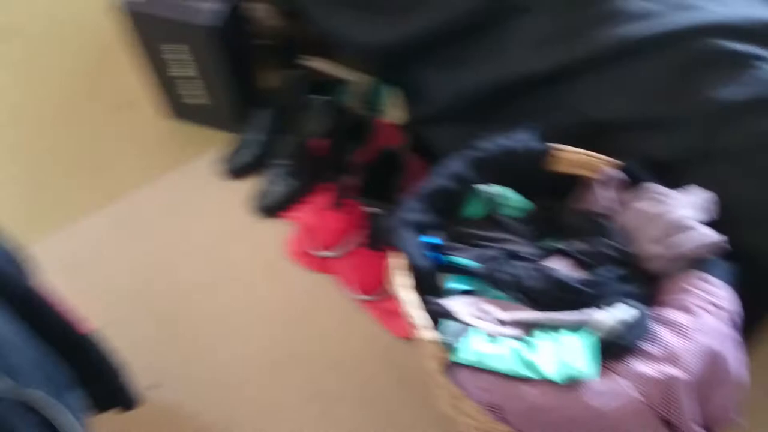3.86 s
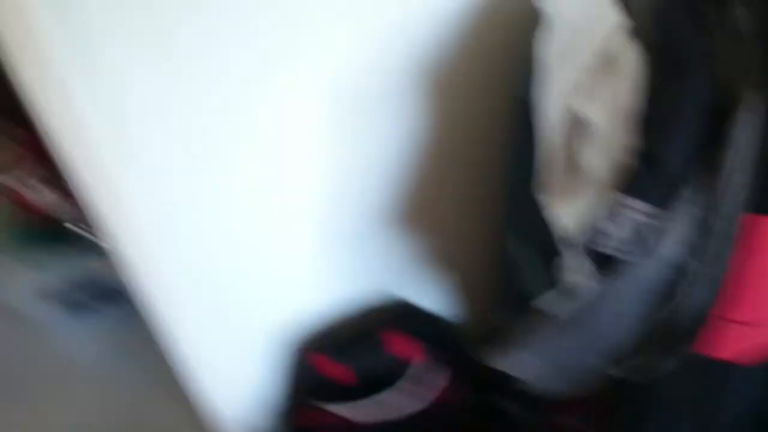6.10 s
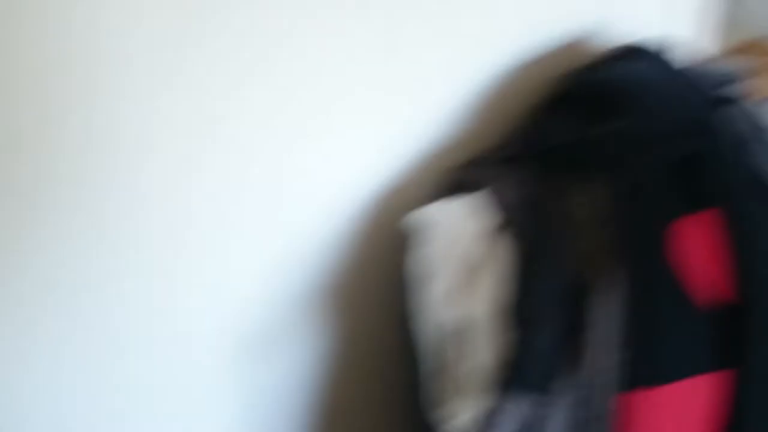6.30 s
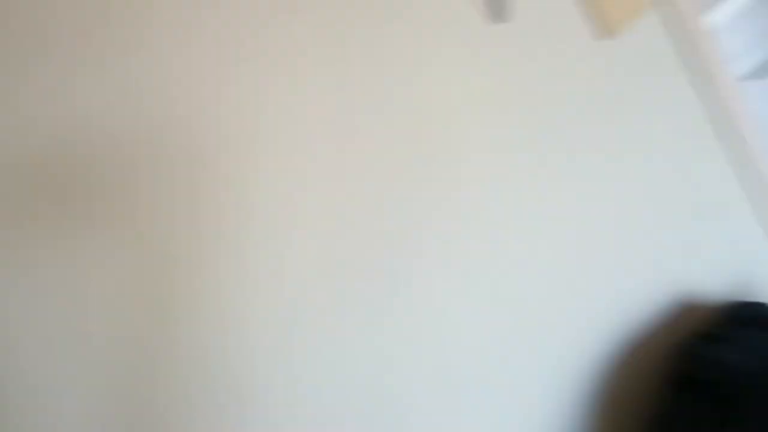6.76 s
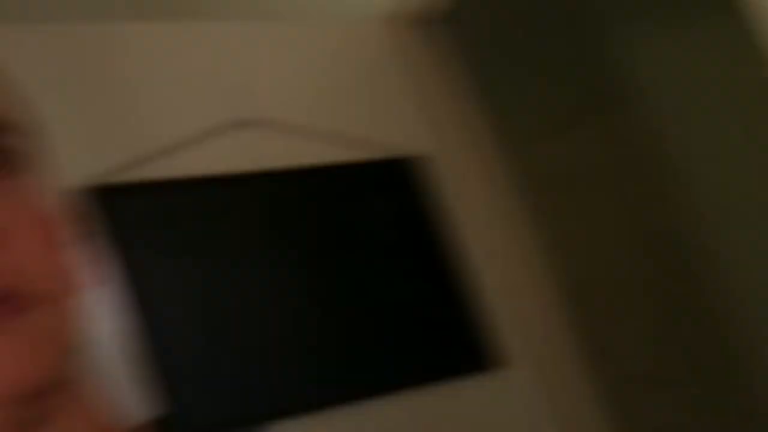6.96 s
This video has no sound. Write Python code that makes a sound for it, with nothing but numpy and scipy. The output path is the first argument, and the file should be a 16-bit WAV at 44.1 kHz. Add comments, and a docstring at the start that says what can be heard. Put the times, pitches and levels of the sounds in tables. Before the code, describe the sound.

Low, muffled thuds come irregularly through the body of a handheld camera as a person moves around a quiet room. Faint fabric swishes, microphone hiss and a slight high whine lie underneath. A small plastic click comes past the middle. Toward the end the handling grows louder, with short creaks, a low rumble and two hard, close knocks.

```python
"""A quiet carpeted room: someone walks about with a small camera in the hand.
Footfalls and fingers jolt its case, and the microphones inside answer each jolt with a dull thump.
Sleeves rustle faintly over room air, microphone hiss and a thin whine.
Near the end the grip shifts, the shell creaks and the hand knocks it hard."""
import sys
import numpy as np
from scipy import signal
from scipy.fft import rfft, irfft
from scipy.io import wavfile

SR = 44100
rng = np.random.default_rng(int(sys.argv[2]) if len(sys.argv) > 2 else 0)


def wav_record(signal):
    """Record a signal, one row per channel, as 16-bit PCM in the file named by sys.argv[1]."""
    frames = np.transpose(np.atleast_2d(signal))
    bounded = np.clip(frames, -1, 1)
    # unit amplitude maps onto the largest positive 16-bit level
    quanta = np.round(bounded * 32767).astype(np.int16)
    wavfile.write(sys.argv[1], SR, quanta)


N = 309582
TIME = np.arange(N) / SR
SHOT = 8192  # samples per short event
LEAD_S = .02  # build-up of a push before its peak


def undb(db):
    """Decibels to gain."""
    return 10 ** (np.asarray(db) / 20)


def unit(x):
    """Scale to rms 1."""
    return x / np.sqrt(np.mean(x ** 2))


def axis_of(size):
    """Imaginary frequency axis in Hz: the s of the filters."""
    return 1j * np.fft.rfftfreq(size, 1 / SR)


def band(s, hz, width_hz):
    """One resonance, gain 1 at its centre."""
    return s * width_hz / (s * s + s * width_hz + hz * hz)


def low_pass(s, hz, damping):
    """Second-order roll-off."""
    return 1 / (1 + damping * s / hz + (s / hz) ** 2)


def noise(response, channels=2):
    """Independent noises with the given response, rms 1."""
    return unit(irfft(rfft(rng.standard_normal((channels, N))) * response, N))


def colour(points):
    """Response through (Hz, dB) points, rolled off below the first."""
    hz, db = np.transpose(points)
    f = abs(axis_of(N)) + 1
    return undb(np.interp(np.log(f), np.log(hz), db)) * np.minimum(f / hz[0], 1) ** 2


def drift(rate_hz):
    """Random values joined by straight lines."""
    steps = rng.standard_normal(int(N / SR * rate_hz) + 2)
    return np.interp(TIME * rate_hz, np.arange(len(steps)), steps)


def strength(x, release_s):
    """Running rms that dies away after each push."""
    keep = np.exp(-1 / (release_s * SR))
    power = np.mean(x ** 2, axis=0) + 1e-18
    return np.sqrt(signal.lfilter([1 - keep], [1, -keep], power))


def add(out, start_s, sound, pan_db=0):
    """Mix a sound in; pan is left minus right."""
    i = int(start_s * SR)
    gains = undb([[pan_db / 2], [-pan_db / 2]])
    out[:, i:i + sound.shape[-1]] += (gains * sound)[:, :N - i]


def microphones(left, right, lag_s=0.00086):
    """Spectra to stereo; a wave in the case reaches the right microphone later."""
    return irfft([left, right * np.exp(-2 * np.pi * axis_of(SHOT) * lag_s)])


def case_ring(s, broaden=1):
    """A jolt passes straight through the case and also rings its modes."""
    # Each row: centre in Hz, width in Hz, level in dB over the plain jolt.
    modes = [(207, 35, -8), (268, 16, -3.5), (309, 26, -0.5), (439, 42, 6.5), (960, 80, -14)]
    return 1 + sum(undb(db) * band(s, hz, broaden * width_hz) for hz, width_hz, db in modes)


def background(floor_db=-67.5, shared_hz=1100, whine_hz=4627, whine_db=-81.5, sink_s=2.4, sink_db=11):
    """Room air, alike on both sides, under microphone hiss and a thin camera whine that sinks once."""
    # Each row: frequency in Hz, relative density in dB.
    floor_spectrum = [(71, -37), (120, -15), (156, -10), (353, -4.5), (415, -4.5), (575, -5.5), (899, -4),
                      (1430, -7), (1720, -7), (2590, -9), (4760, -9), (6870, -13.5), (15500, -13.5)]
    shared = 1 / (1 + abs(axis_of(N) / shared_hz) ** 2)
    air = rfft(rng.standard_normal(N)) * np.sqrt(shared)
    hiss = rfft(rng.standard_normal((2, N))) * np.sqrt(1 - shared)
    floor = unit(irfft((air + hiss) * colour(floor_spectrum), N))
    floor *= undb(floor_db + 0.04 * drift(0.56))
    pitch_hz = whine_hz + 22 * drift(40)
    whine = np.sin(2 * np.pi * np.cumsum(pitch_hz) / SR)
    return floor + whine * undb(whine_db - sink_db * (TIME > sink_s) + 3 * drift(17))


def stroke(peak_s, rise_s, fall_s, drop_db=13, roundness=1.74):
    """Gain of one arm movement, which speeds up and slows again."""
    away = np.maximum((peak_s - TIME) / rise_s, (TIME - peak_s) / fall_s)
    return undb(-drop_db * np.minimum(away, 10) ** roundness)


def sleeve(grain_db=3.5, drag_hz=240, drag_width_hz=260):
    """Fabric brushes in grainy swishes, drags dully over the case and now and then crinkles."""
    # Each row: fastest moment, rise and fall in seconds, top level in dB, drag in dB relative to it.
    strokes = [(0.016, 0.011, 0.046, -64.5, 4), (0.625, 0.03, 0.13, -58.5, -1.5),
               (3.95, 0.17, 0.18, -70.5, -5.5), (4.33, 0.057, 0.21, -72.5, -3),
               (4.565, 0.025, 0.059, -63.5, -7), (5.31, 0.12, .07, -63, -7.5), (6.12, 0.093, 0.11, -71, 1),
               (6.585, 0.053, 0.076, -67, 0), (6.9, 0.041, 0.1, -66, 3)]
    # Each row: frequency in Hz, relative density in dB.
    cloth_spectrum = [(1200, -14), (2400, -15.5), (3600, -8.5), (4500, -5.5), (5400, -3.5), (6300, -10.5),
                      (7500, -23), (15000, -21.5)]
    # Each row: start in seconds, peak in dB, centre in Hz, decay in seconds.
    crinkles = [(0.064, -49, 4300, 0.0032), (0.688, -55, 3980, 0.043), (4.826, -60, 5600, 0.013),
                (5.489, -49.5, 4900, 0.006)]
    effort, drag = 0, 0
    for peak_s, rise_s, fall_s, db, drag_db in strokes:
        move = undb(db) * stroke(peak_s, rise_s, fall_s)
        effort += move
        drag += undb(drag_db) * move
    out = noise(colour(cloth_spectrum)) * effort * undb(grain_db * drift(260))
    out += noise(band(axis_of(N), drag_hz, drag_width_hz) ** 3) * drag
    for start_s, db, hz, decay_s in crinkles:
        burst = rng.standard_normal((2, SHOT)) * np.exp(-TIME[:SHOT] / decay_s)
        resonance = band(axis_of(SHOT), hz, 6 / decay_s) ** 2  # short ones click, long ones squeak
        crinkle = irfft(rfft(burst) * resonance)
        add(out, start_s, undb(db) * crinkle / abs(crinkle).max())
    return out


def tremor(thumps, boom_hz=64, width_hz=34, apart_db=-7, rub_db=-18, sway_db=-27.5, sway_s=0.2):
    """The restless grip rocks the camera, more so after each thump; the palm rubs it in spurts."""
    # Each row: time in seconds, relative unrest of the hand in dB.
    grip = [(0, -72.5), (3, -71), (4.5, -66), (5.92, -69.5), (6.05, -47), (6.7, -51), (7.02, -31)]
    s = axis_of(N)
    rocking = band(s, boom_hz, width_hz) * band(s, 1.16 * boom_hz, 1.75 * boom_hz) ** 2
    rumble = noise(rocking, channels=1) + undb(apart_db) * noise(rocking)
    rub = noise(band(s, hz=240, width_hz=220) ** 2) * undb(rub_db + 3.2 * drift(32))
    hand = undb(np.interp(TIME, *np.transpose(grip)))
    arm_sway = undb(sway_db) * strength(thumps, sway_s)
    return np.hypot(hand, arm_sway) * (rumble + rub) * undb(drift(7.2) - 1.5)


def creaks(jitter=.14, scatter_db=3, edge_hz=780):
    """Skin sticks and slips on the shell; each slip rings the case."""
    # Each row: start and length in seconds, slips per second, rms level in dB.
    slides = [(6.139, 0.029, 420, -40.5), (6.547, 0.025, 300, -42.5), (6.433, 0.032, 400, -58),
              (6.83, 0.027, 330, -56), (6.884, 0.018, 385, -43), (6.911, 0.055, 430, -40.5)]
    out, s = np.zeros((2, N)), axis_of(SHOT)
    shell = case_ring(s, broaden=1.4) * low_pass(s, edge_hz, damping=2.8) ** 3
    for start_s, length_s, rate_hz, db in slides:
        spacing, scatter = rng.standard_normal((32, 2)).T
        slip_s = np.cumsum(1 + jitter * spacing) / rate_hz
        sizes = np.sin(np.pi * np.clip(slip_s / length_s, 0, 1)) * undb(scatter_db * scatter)
        slips = sizes @ np.exp(-2 * np.pi * np.outer(slip_s, s))
        ring = slips * shell * (s / (s + rate_hz)) ** 2
        add(out, start_s, undb(db) * unit(microphones(ring, ring)) * np.sqrt(length_s * SR / SHOT))
    return out


def ticks(shell_hz=420, hollow_db=-1, rattle_db=-24, rattle_s=0.0063):
    """A seam of the plastic shell snaps and rattles briefly, differently at each microphone."""
    # Each row: start in seconds, peak in dB, edge in Hz, pan in dB.
    snaps = [(3.9846, -30.5, 1250, -8), (4.481, -62, 1100, -18), (5.341, -48.5, 1080, -7),
             (6.569, -35, 2300, -5), (6.892, -34.5, 970, 8)]
    out, s = np.zeros((2, N)), axis_of(SHOT)
    shell = band(s, shell_hz, width_hz=1100) + undb(hollow_db) * band(s, shell_hz, width_hz=110)
    for start_s, db, edge_hz, pan_db in snaps:
        rattle = rng.standard_normal((2, SHOT)) * np.exp(-TIME[:SHOT] / rattle_s)
        force = (1 + undb(rattle_db) * rfft(rattle)) * low_pass(s, edge_hz, damping=1.29) ** 3
        snap = irfft(force * shell)
        add(out, start_s, undb(db) * snap / abs(snap).max(), pan_db)
    return out


def thump_noise(thumps, rub_db=-6, grainy_hiss_db=-49, grain_db=5.5, release_s=0.0048):
    """A dull rub after the harder blows, and a faint grainy hiss that follows each thump."""
    rub_band = band(axis_of(N), hz=290, width_hz=200) ** 3
    hard_blows = irfft(rfft(thumps) * rub_band, N)
    rub = strength(hard_blows, release_s) * noise(rub_band) * undb(rub_db)
    hiss = rng.standard_normal((2, N)) * undb(grainy_hiss_db + grain_db * drift(400))
    return rub + strength(thumps, release_s) * hiss


def thump(db, boom_hz, edge_hz, low_cut_hz, boom_q, right_tuning=0.92):
    """Flesh rounds a push; the camera rocks a few cycles. A high edge is a hard push: the case rings."""
    s = axis_of(SHOT)
    rubber_mount = low_pass(s, hz=600, damping=1.38) * (s / (s + low_cut_hz)) ** 2
    push = np.exp(-abs(s) / edge_hz - 2 * np.pi * s * LEAD_S)  # bell-shaped force
    shake = push * rubber_mount * case_ring(s) * s
    left, right = (shake * band(s, hz, hz / boom_q) for hz in (boom_hz, boom_hz * right_tuning))
    sound = microphones(left, right)
    return undb(db) * sound / abs(sound).max()


def jolts(boom_hz=72.7):
    """Every step and shift of the arm rocks the camera at the same low pitch."""
    # Each row: peak time in seconds, peak in dB, edge in Hz.
    pushes = [(0.213, -33, 74.6), (0.597, -32, 70.4), (0.702, -47, 110), (0.766, -48, 70), (0.823, -43, 60),
              (0.856, -29, 55), (0.917, -45.5, 72), (1.622, -47.5, 52.3), (1.697, -37, 74),
              (1.86, -41.5, 80), (2.049, -29.5, 66), (2.105, -38, 67), (2.328, -51, 36), (2.384, -50, 38.5),
              (3.227, -53, 52), (3.282, -45, 77), (3.325, -40.5, 71), (3.413, -41, 66), (3.721, -48, 86),
              (3.778, -42.5, 41), (4.029, -45, 60), (4.067, -40, 74), (4.567, -30, 54.3),
              (4.765, -32.5, 66), (4.794, -38.5, 98), (4.92, -44.5, 76), (5.219, -50, 86),
              (5.994, -27.5, 90), (6.015, -28, 74), (6.246, -36, 51.7), (6.363, -34, 55), (6.439, -32, 65),
              (6.514, -25, 51.3), (6.793, -32, 50), (6.822, -27, 60)]
    out = np.zeros((2, N))
    for peak_s, db, edge_hz in pushes:
        add(out, peak_s - LEAD_S, thump(db, boom_hz, edge_hz, low_cut_hz=37.4, boom_q=2.98), pan_db=1)
    return out


def knocks():
    """Fingers push the case inward, each with its own hardness and on its own side."""
    # Each row: peak time in seconds, peak in dB, boom in Hz, edge in Hz, pan in dB.
    strikes = [(0.664, -38, 81.5, 126, 1), (0.8433, -24, 123, 121, -1), (1.521, -51, 85.5, 120, 2),
               (2.1832, -37.5, 49.5, 143, 2), (6.089, -21.5, 79, 138, -6.5), (6.108, -27, 60, 140, -4),
               (6.5713, -6.5, 77.7, 343, 5.5), (6.5864, -11, 67.4, 153, 2), (6.9, -12.5, 53, 82, 3.5),
               (6.958, -26, 70, 130, 4)]
    out = np.zeros((2, N))
    for peak_s, db, boom_hz, edge_hz, pan_db in strikes:
        add(out, peak_s - LEAD_S, -thump(db, boom_hz, edge_hz, low_cut_hz=22, boom_q=1.9), pan_db)
    return out


def scene():
    """Everything the two microphones pick up."""
    thumps = jolts() + knocks()
    return thumps + thump_noise(thumps) + ticks() + creaks() + tremor(thumps) + sleeve() + background()


def record(dry):
    """The camera cuts the top treble steeply."""
    top_hz = 15750
    return signal.sosfilt(signal.ellip(10, .2, 70, top_hz, fs=SR, output="sos"), dry)


dry = scene()
out = record(dry)
wav_record(out)
```